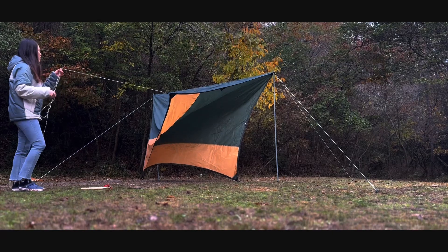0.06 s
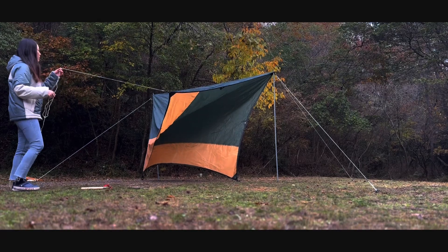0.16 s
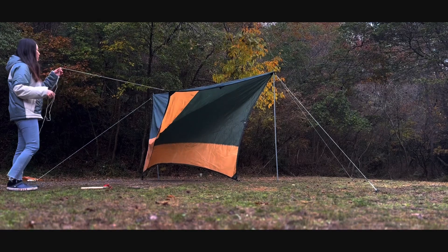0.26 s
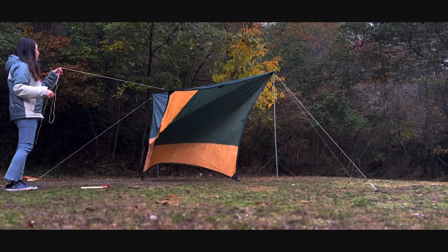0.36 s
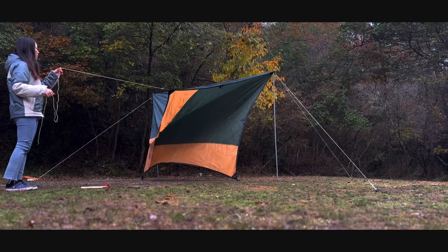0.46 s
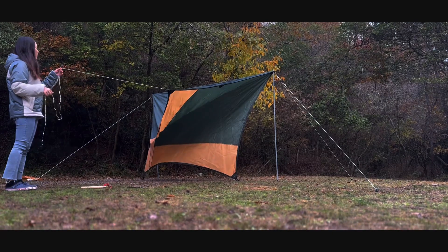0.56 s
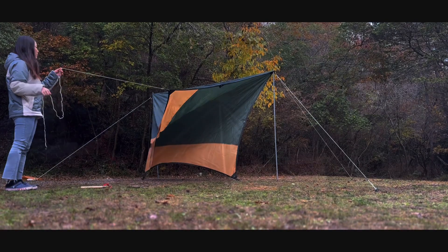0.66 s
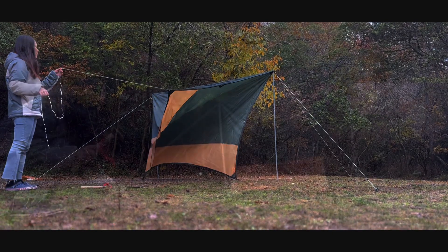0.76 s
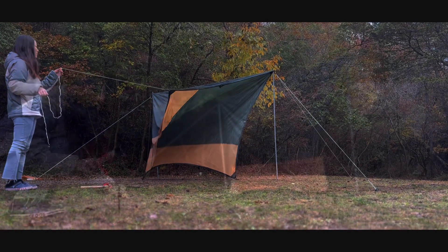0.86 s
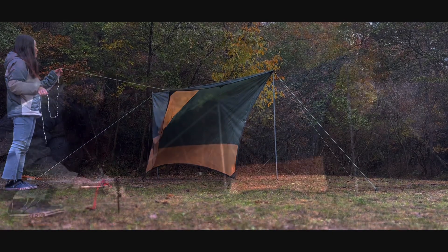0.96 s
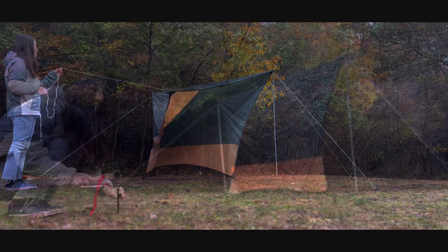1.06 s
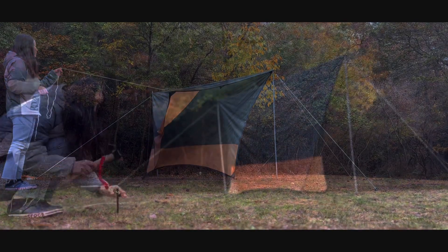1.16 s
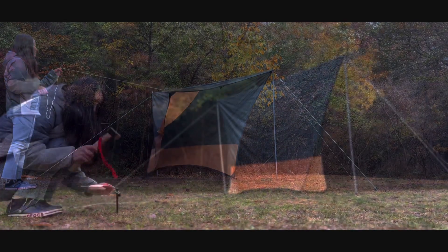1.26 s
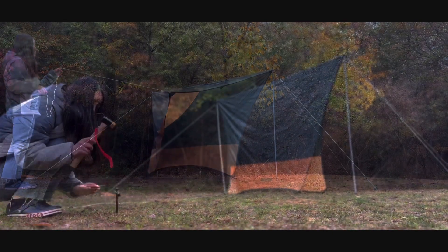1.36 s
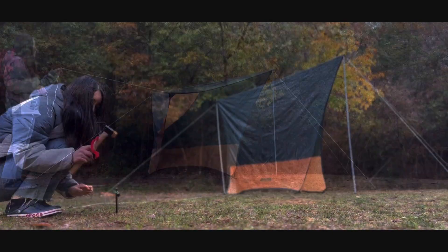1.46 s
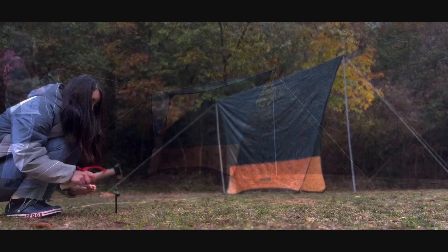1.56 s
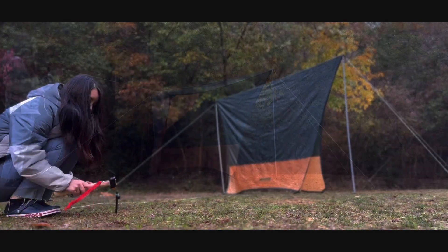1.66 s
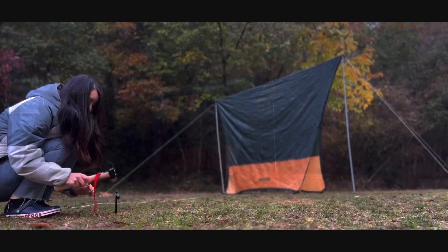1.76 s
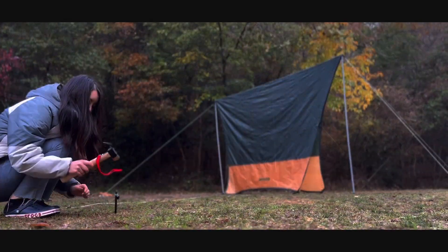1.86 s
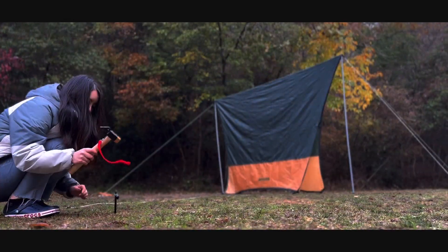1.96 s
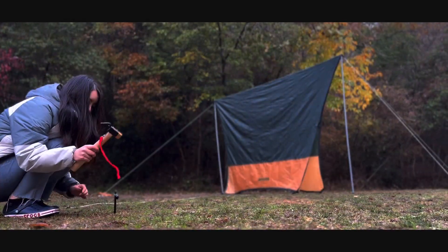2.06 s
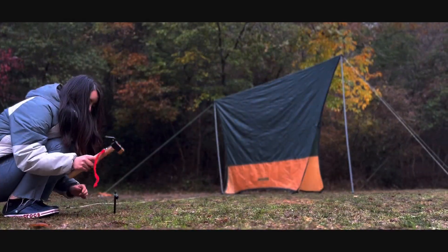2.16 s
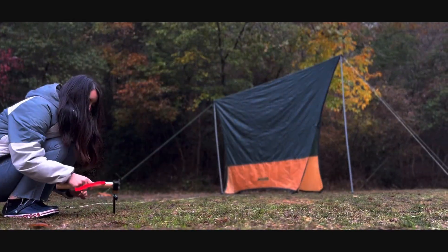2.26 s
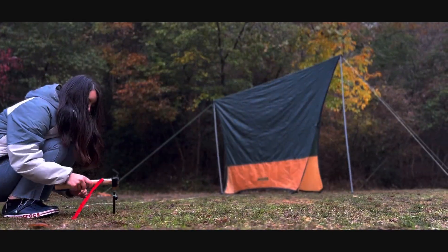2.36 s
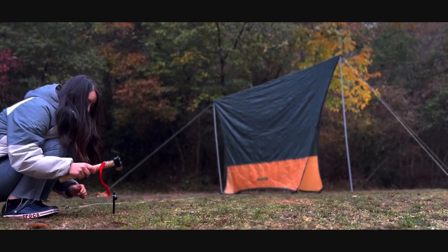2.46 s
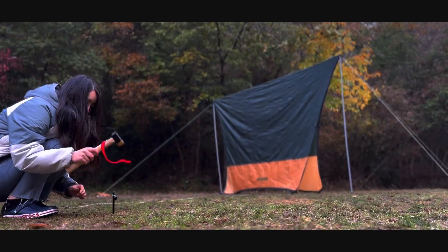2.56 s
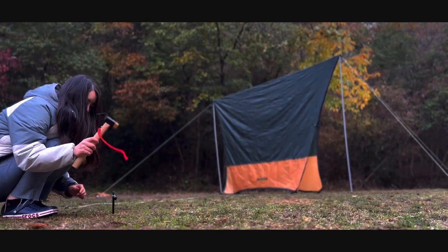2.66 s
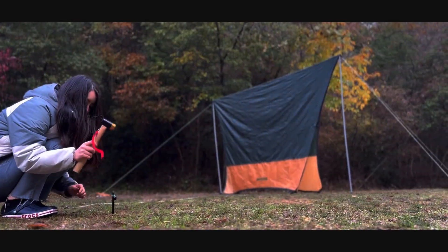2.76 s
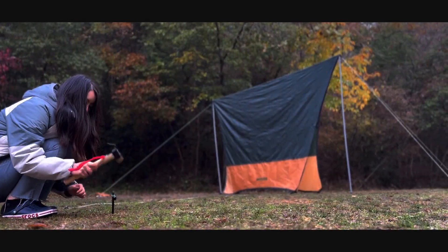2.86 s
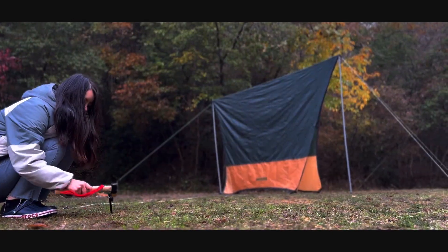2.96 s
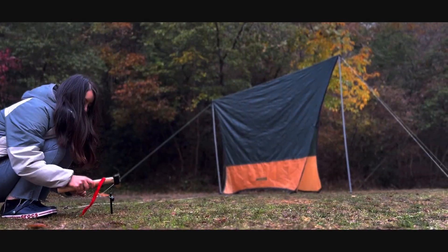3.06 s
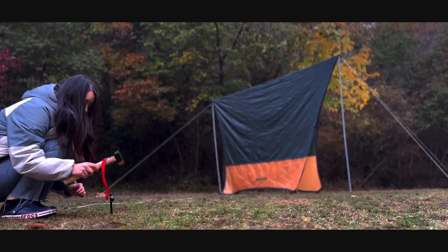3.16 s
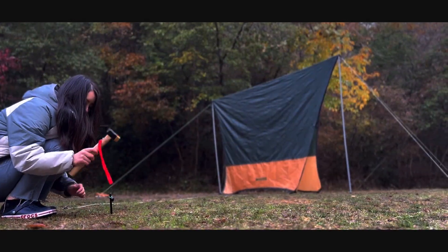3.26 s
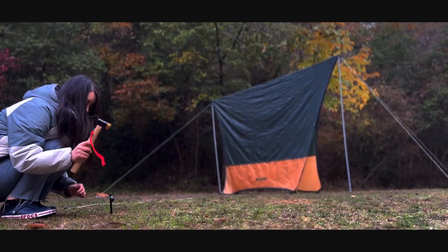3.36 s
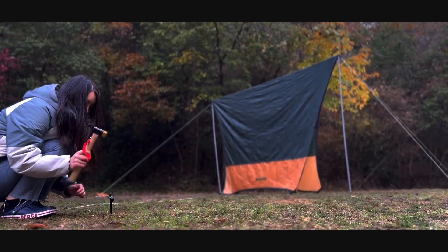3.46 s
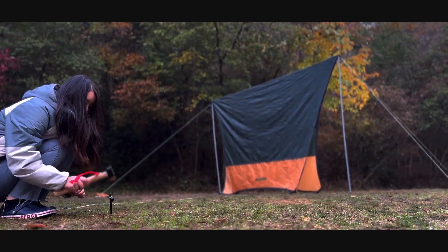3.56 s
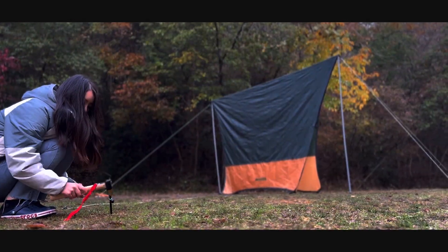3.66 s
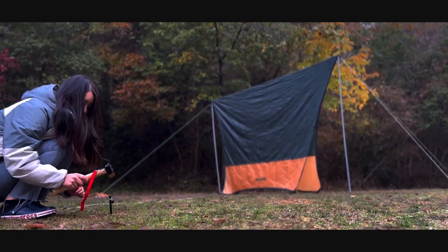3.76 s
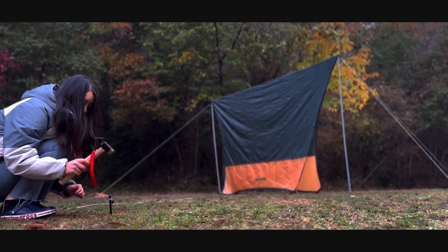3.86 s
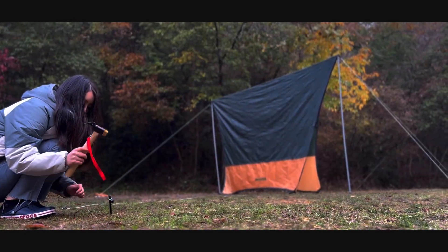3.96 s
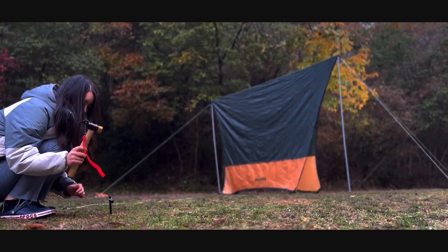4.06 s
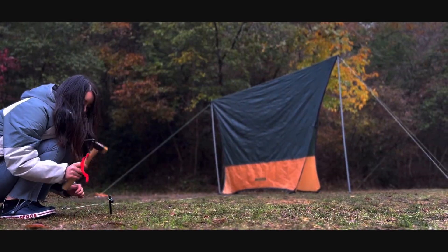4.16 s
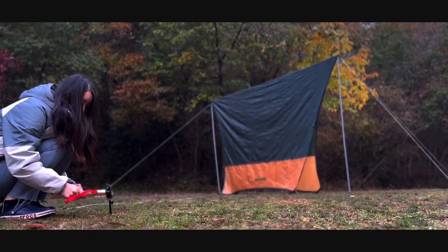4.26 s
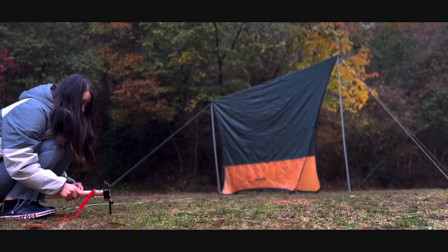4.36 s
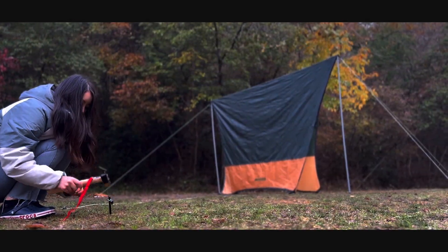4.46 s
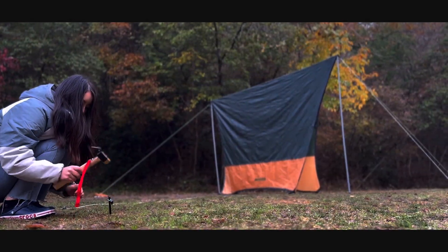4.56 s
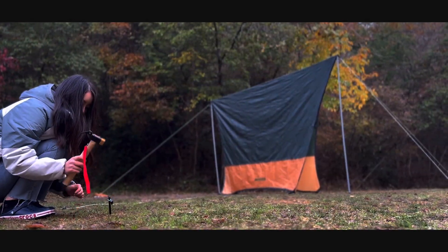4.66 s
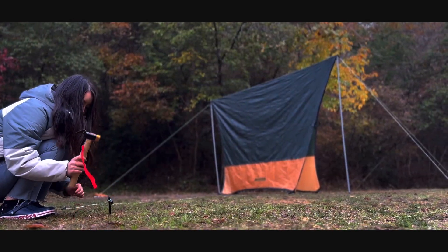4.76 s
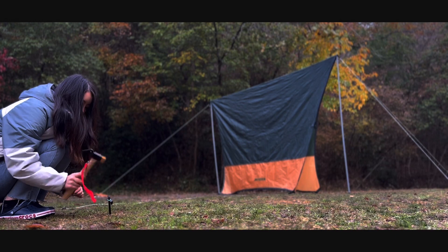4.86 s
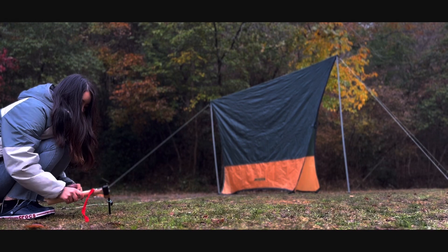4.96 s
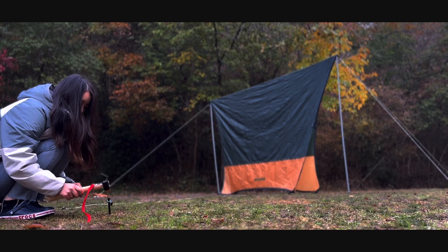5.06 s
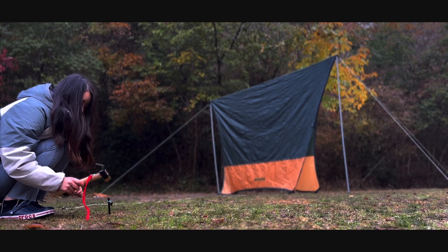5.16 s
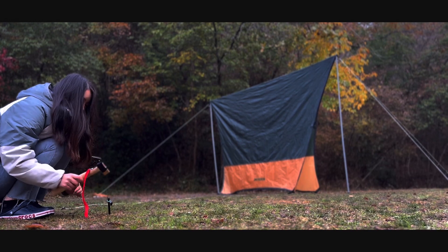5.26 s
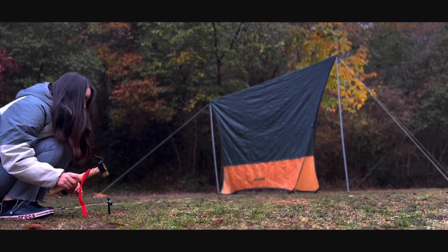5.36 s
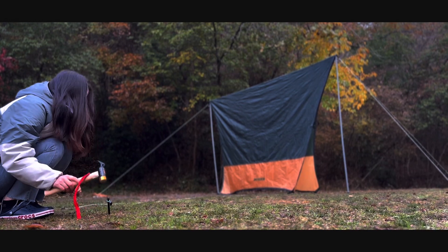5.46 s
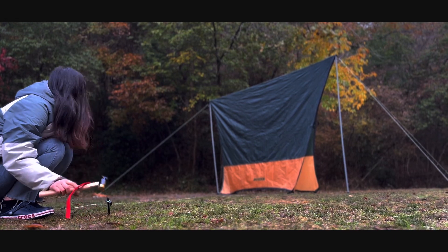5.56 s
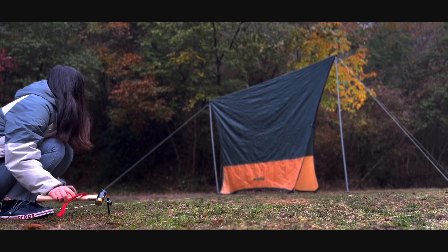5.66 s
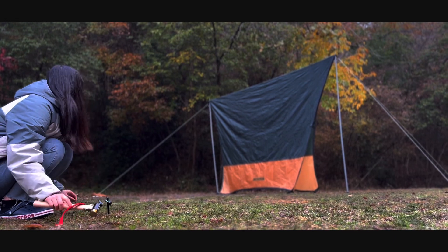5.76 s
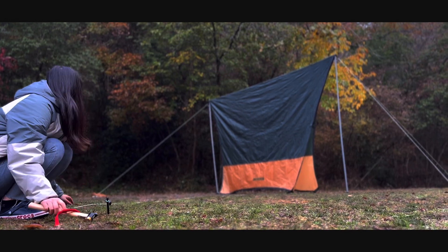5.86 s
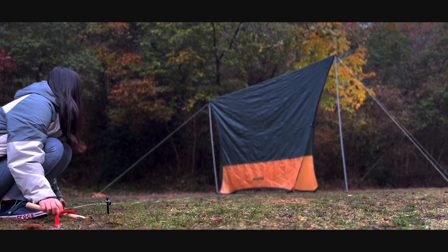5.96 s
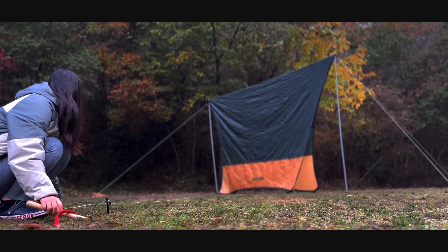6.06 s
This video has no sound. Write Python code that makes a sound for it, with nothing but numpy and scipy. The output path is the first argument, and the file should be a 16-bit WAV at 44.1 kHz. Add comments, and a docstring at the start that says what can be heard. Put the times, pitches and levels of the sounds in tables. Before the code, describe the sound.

A hammer drives a steel tent peg into the ground with seven sharp, steady clanks that echo off nearby trees.

```python
"""Light taps of gear sound in faint, still air at the edge of a wood; a foot settles in dry grass and a
low rumble sets in. A hammer then drives a steel tent peg into turf: seven blows, each led by the swish
of a nylon sleeve. Each impact excites the modes of the steel, which the soil damps at once into a hard
clank; twice the hammer drops back on the peg. The tarp reflects a quick slap, and scattering from the
trees returns a bright, swelling echo."""
import sys
import numpy as np
from scipy import signal
from scipy.fft import rfft, irfft
from scipy.io import wavfile

SR = 44100
rng = np.random.default_rng(int(sys.argv[2]) if len(sys.argv) > 2 else 0)


def put_to_file(sound):
    """Save the sound as 16-bit audio at rate SR, in the file named by the first command-line argument."""
    columns = np.atleast_2d(sound).T  # one column per channel
    safe = np.clip(columns, -1, 1)
    whole_steps = np.round(safe * 32767)
    wavfile.write(sys.argv[1], SR, whole_steps.astype(np.int16))


N = 269892

# hammer blows: t/s, force/dB, knock f/Hz, knock level/dB, clank gain/dB, treble gain/dB,
# peg note f/Hz, peg note level/dB, sleeve level/dB
BLOWS = [(0.929, -3.5, 1150, -23.5, 1, 3.5, 4943, -23, -76),
         (1.5825, -1, 1000, -21, 1.5, 2, 4430, -18, -77), (2.258, -1, 870, -19, 2, 3, 4436, -19.5, -79.5),
         (2.9196, -0.5, 1089, -20, 1, 1.5, 4380, -19, -73),
         (3.5834, 0.5, 1087, -20, 1, 5, 5124, -21.5, -71.5),
         (4.2438, -0.5, 672, -20, 2, 4.5, 5170, -24.5, -81.5),
         (4.9298, -1, 585, -18, 2, 4, 3634, -21, -81.5)]
THIRD_OCTAVES_HZ = 20 * 2 ** (np.arange(30) / 3)


def from_db(db):
    """Amplitude ratio of a level in decibels."""
    return 10 ** (np.asarray(db) / 20)


def at_hz(points, hz):
    """Interpolation on a logarithmic frequency axis."""
    freqs, values = np.transpose(points)
    return np.interp(np.log(hz), np.log(freqs), values)


def seconds(length):
    """Time axis of a given number of samples."""
    return np.arange(length) / SR


def unit_energy(x):
    """Normalisation to a mean energy of one per channel."""
    return x / np.sqrt(np.sum(x ** 2) / (x.size / x.shape[-1]) + 1e-20)


def butter(x, hz, kind, order=2):
    """Causal Butterworth filter."""
    sections = signal.butter(order, np.clip(hz, 10, .48 * SR), kind, fs=SR, output="sos")
    return signal.sosfilt(sections, x)


def add(track, s, sound):
    """Superposition of a sound on a track, starting at time s."""
    start = max(round(s * SR), 0)
    part = sound[:max(N - start, 0)]
    track[start:start + len(part)] += part


def hump(s, sigma_s):
    """Gaussian envelope centred on time s, peak 1."""
    return np.exp(-.5 * ((seconds(N) - s) / sigma_s) ** 2)


def waver(spread_db, step_s):
    """Random level drift in dB, with a new value every step."""
    return spread_db * np.interp(seconds(N) / step_s, np.arange(N), rng.standard_normal(N))


def stereo_bands(length):
    """Diffuse field in third octaves, most coherent in the bass: yields (f/Hz, stereo noise)."""
    # likeness of left and right: f/Hz, correlation
    likeness = [(60, 0.94), (130, 1), (290, 0.2), (640, 0.91), (1400, -0.55), (3100, .08), (6800, -0.42),
                (15000, -.05)]
    white = rng.standard_normal((2, 2, length))
    for k, edges in enumerate(zip(THIRD_OCTAVES_HZ, THIRD_OCTAVES_HZ[1:])):
        hz = np.sqrt(edges[0] * edges[1])
        mid, side = butter(white[k % 2], edges, "band")
        alike = np.clip(at_hz(likeness, hz), -1, 1)
        yield hz, np.sqrt(1 + alike) * mid + np.sqrt(1 - alike) * side * [[1], [-1]]


def diffuse_noise(spectrum):
    """Diffuse stereo noise with a given spectral shape, rms 1."""
    noise = sum(from_db(at_hz(spectrum, hz)) * band for hz, band in stereo_bands(N))
    return np.sqrt(N) * unit_energy(noise)


def still_air(level_db=-73):
    """Stationary noise: the faint, even hiss of air among the trees."""
    # hiss spectrum: f/Hz, relative density/dB
    spectrum = [(200, 4), (450, -10.5), (900, -10.5), (1800, -13.5), (3000, -18.5), (5500, -17),
                (9500, -25), (12500, -30), (16000, -31.5)]
    return from_db(level_db) * diffuse_noise(spectrum)


def tick(t, hz, t60, spread=1.93):
    """Heavily damped transient: decaying noise in a broad band round hz, peak 1."""
    noise = rng.standard_normal(len(t)) * from_db(-60 * t / t60)
    burst = butter(noise, [hz / spread, hz * spread], "band", order=3)
    return burst / np.abs(burst).max()


def gear_taps(thump_lag_s=0.00314):
    """Impulse response of tapped gear: a click, a short hollow resonance and a thump just behind."""
    # taps: t/s, level/dB, body f/Hz, click level/dB re body, thump level/dB re body
    taps = [(0.062, -58.5, 970, -10, -8), (.112, -66, 1090, -17, 0), (1.228, -52.5, 1530, -20, -28),
            (1.345, -51, 850, 6.5, 2.5), (1.785, -56.5, 990, -25, 0.5)]
    out, t = np.zeros(N), seconds(SR // 8)
    for s, db, body_hz, click_db, thump_db in taps:
        body = tick(t, body_hz, t60=0.043)
        click = from_db(click_db) * tick(t, hz=5000, t60=0.016)
        add(out, s, from_db(db) * (body + click))
        add(out, s + thump_lag_s, from_db(db + thump_db) * tick(t, hz=260, t60=0.05))
    return out


def footstep(step_s=.305, sole_lag_s=0.00815, grains_per_s=900, crunch_hz=1610, spread=1.97):
    """Brittle fracture: dry grass crunches under a sole, then single stalks snap, thinner ones last."""
    # snapping stalks: t/s, level/dB
    stalks = [(0.299, -61), (0.332, -56), (0.364, -51.5), (0.379, -54.5), (0.41, -56)]
    t = seconds(SR // 8)
    grains = (rng.random(N) < grains_per_s / SR) * rng.choice([-1, 1], N)
    grains = grains * from_db(3 * rng.standard_normal(N))
    crunch = butter(grains, [crunch_hz / spread, crunch_hz * spread], "band")
    out = from_db(-62) * hump(step_s, sigma_s=0.017) * crunch / crunch.std()
    add(out, step_s + sole_lag_s, from_db(-51) * tick(t, hz=208, t60=0.029))
    for s, db in stalks:
        snap_hz = 2830 + 5700 * (s - step_s)
        add(out, s, from_db(db) * tick(t, snap_hz, t60=0.0093, spread=2.15))
    return out


def distant_rumble(start_s=.468, rise_s=.028, lull_db=-65, boost_db=2):
    """Amplitude-modulated bass noise: a distant rumble sets in after a lull and wavers."""
    # slow drift of the rumble: t/s, relative level/dB
    drift = [(0.68, -47), (1.04, -46.5), (1.86, -50.5), (2.96, -50), (3.13, -52), (3.35, -55),
             (3.58, -52.5), (4.7, -51), (4.91, -46.5), (5.74, -48), (5.89, -50), (6.1, -49.5)]
    # rumble spectrum: f/Hz, relative density/dB
    spectrum = [(13, -41), (22, -10), (52, 1.5), (94, -0.5), (122, -5), (260, -26.5), (365, -58.5),
                (500, -35.5), (650, -73), (1100, -120)]
    t = seconds(N)
    onset = np.clip((t - start_s) / rise_s, 0, 1)
    drift_db = np.interp(t, *np.transpose(drift)) + boost_db
    envelope = from_db(lull_db + onset * (drift_db - lull_db) + waver(spread_db=1, step_s=.09))
    return butter(envelope * diffuse_noise(spectrum), 36, "high", order=4)


def sleeve(lead_s=.08, swing_sigma_s=.06, swing_rub_db=-1):
    """Sliding friction: nylon hisses and padding rubs as the arm swings or the body shifts."""
    # nylon on nylon: f/Hz, relative density/dB
    nylon = [(500, -12), (2000, -2), (3000, -10.5), (4500, -1.5), (6500, 2.5), (9500, -4), (12500, -4),
             (16000, -3.5)]
    # dull rub of the padding: f/Hz, relative density/dB
    padding = [(250, -7.5), (600, 1.5), (1100, 2.5), (1700, -10), (4000, -23.5), (12000, -43)]
    # shifts of the body: t/s, Gaussian width/s, hiss level/dB, rub level/dB
    shifts = [(.53, 0.1, -77.5, -78.5), (1.29, 0.1, -68, -72), (1.962, 0.066, -71, -69),
              (5.52, 0.16, -76.5, -80.5), (6.09, .074, -75, -70.5)]
    swings = [(s - lead_s, swing_sigma_s, db, db + swing_rub_db) for s, *_, db in BLOWS]
    hiss = rub = 0
    for s, sigma_s, hiss_db, rub_db in swings + list(shifts):
        speed = hump(s, sigma_s)
        hiss += from_db(hiss_db) * speed
        rub += from_db(rub_db) * speed
    folds = from_db(waver(spread_db=1.5, step_s=0.03))   # folds catch and slip
    return folds * (hiss * diffuse_noise(nylon) + rub * diffuse_noise(padding))


def strike_gain(hz, clank_db, treble_db):
    """The point of excitation on the peg head shifts weight between clank and treble."""
    curve = [(1000, 0), (2000, clank_db), (3300, clank_db), (5000, 0), (8000, 0), (12000, treble_db)]
    return from_db(at_hz(curve, hz))


def crack(t, tone, contact_s=.002, snap_db=3, snap_s=.0005):
    """Contact noise: steel snaps on steel and the peg grinds forward; the treble decays first."""
    # steel on steel and grit along the shaft: f/Hz, relative density/dB
    spectrum = [(150, 4.5), (400, 2), (560, 8.5), (900, 7.5), (1300, 4.5), (1800, -1.5), (2800, 10.5),
                (3900, -2.5), (5500, 4.5), (7500, 7.5), (11000, 1.5), (13500, -1.5), (16000, 6.5)]
    # decay of the crack: f/Hz, T60/s
    decay = [(200, .04), (800, .024), (2500, .02), (5000, .019), (8000, .015), (14000, .012)]
    out = np.zeros(len(t))
    for edges in zip(THIRD_OCTAVES_HZ[8:], THIRD_OCTAVES_HZ[9:]):
        hz = np.sqrt(edges[0] * edges[1])
        fade_db = snap_db * np.exp(-t / snap_s) - 60 * np.maximum(t - contact_s, 0) / at_hz(decay, hz)
        grind = butter(rng.standard_normal(len(t)) * from_db(fade_db), edges, "band")
        band_share = np.sqrt(2 * (edges[1] - edges[0]) / SR)
        out += unit_energy(grind) * band_share * from_db(at_hz(spectrum, hz)) * strike_gain(hz, *tone)
    return out


def ring(t, hz, t60):
    """Free vibration of one damped mode."""
    return np.sin(2 * np.pi * hz * t) * from_db(-60 * t / t60)


def steel_modes(t, tone, note_hz, note_db):
    """Modal superposition: the peg's note, which changes as it sinks, among other short-lived modes."""
    # modes of peg and hammer head: f/Hz, level/dB, T60/s
    modes = [(610, -28, .016), (1320, -27.5, .018), (2450, -27, .02), (2880, -24, .018),
             (3130, -27.5, .018), (3630, -27, .02), (4375, -28, .02), (5150, -28.5, .02), (6820, -27, .015),
             (7400, -23.5, .013), (8190, -22, .014), (9090, -30, .012), (12930, -16, .011),
             (13350, -18, .008), (14000, -24, .008), (15420, -22, .009)]
    out = from_db(note_db) * ring(t, note_hz, t60=.025)
    for hz, db, t60 in modes:
        stray_db, detune = rng.standard_normal(2)
        if abs(hz / note_hz - 1) > .03:   # the note replaces any mode within 3 %
            mode_hz = hz * (1 + .006 * detune)   # the soil grips differently each time
            amplitude = rng.choice([-1, 1]) * from_db(db + stray_db) * strike_gain(hz, *tone)
            out += amplitude * ring(t, mode_hz, t60)
    return out


def turf_thud(t, thud_hz=180, stiff_hz=100, relax_s=0.0042, thud_db=-28, t60=0.062, rise_s=0.003):
    """Damped oscillation of the ground under the peg, falling in pitch as its stiffness relaxes."""
    cycles = thud_hz * t + stiff_hz * relax_s * (1 - np.exp(-t / relax_s))
    envelope = from_db(thud_db - 60 * t / t60) * (1 - np.exp(-t / rise_s))
    return envelope * np.sin(2 * np.pi * cycles)


def impact(t, knock_hz, knock_db, tone, note_hz, note_db, knock_rise_s=.0008):
    """Impulsive excitation: one contact makes the peg clank and knock, and shakes the turf."""
    knock = from_db(knock_db) * ring(t, knock_hz, t60=0.02) * (1 - np.exp(-t / knock_rise_s))
    peg = crack(t, tone) + steel_modes(t, tone, note_hz, note_db) + knock
    radiated = butter(peg, 410, "high", order=3)   # little of the clank lies below 400 Hz
    return radiated + turf_thud(t)


def hammering(tones_db=0):
    """Impact and rebound: full blows, two followed by a softer and therefore duller contact."""
    # the hammer drops back on the peg: t/s, force/dB
    rebounds = [(1.6109, -19), (2.9377, -17.5)]
    out, t = np.zeros(N), seconds(SR // 10)
    for s, force_db, knock_hz, knock_db, clank_db, treble_db, note_hz, note_db, _ in BLOWS:
        hit = impact(t, knock_hz, knock_db + tones_db, (clank_db, treble_db), note_hz, note_db + tones_db)
        add(out, s, from_db(force_db) * hit)
    for s, force_db in rebounds:
        last_blow = max(blow for blow in BLOWS if blow[0] < s)
        _, _, knock_hz, knock_db, clank_db, treble_db, *note, _ = last_blow
        touch = impact(t, knock_hz, knock_db + 0.5, (clank_db, treble_db - 4.5), *note)
        add(out, s, from_db(force_db) * touch)
    return out


def tarp_slaps(x):
    """Early reflections: the tarp and the camp gear each throw back part of the spectrum."""
    # reflections: delay/s, level/dB, lowest f/Hz, highest f/Hz
    reflections = [(.0245, -29, 5000, 15000), (.020, -28, 600, 1200), (.032, -24, 1100, 2100)]
    out = np.zeros(N)
    for delay_s, db, low_hz, high_hz in reflections:
        add(out, delay_s, from_db(db) * butter(x, [low_hz, high_hz], "band"))
    return out


def wood_echo(x, first_s=0.0089, edge_s=0.02, full_s=.062, near_db=-7):
    """Scattering: ground and tarp answer faintly, then the tree line, fading into the wood's depth."""
    # echo spectrum: f/Hz, level/dB re the incident sound
    spectrum = [(150, -16.5), (400, -19.5), (800, -28.5), (1300, -16), (2800, -21.5), (4500, -11),
                (7500, -18), (11000, -21.5), (13000, -21.5), (16000, -27)]
    # reverberation time of the wood: f/Hz, T60/s
    decay = [(200, 0.2), (1000, 0.57), (3000, 0.42), (4500, 0.58), (8000, 0.38), (13000, 0.26),
             (16000, 0.15)]
    t = seconds(SR * 4 // 5)
    swell = from_db(np.interp(t, [0, first_s, edge_s, full_s], [-40, near_db, near_db, 0]))
    # single trunks make the echo lumpy
    lumps = from_db(np.interp(t, np.linspace(0, t[-1], 160), rng.standard_normal(160)))
    response = 0
    for hz, band in stereo_bands(len(t)):
        fade = from_db(-60 * np.maximum(t - full_s, 0) / at_hz(decay, hz))
        envelope = unit_energy(swell * fade * lumps)
        response += from_db(at_hz(spectrum, hz)) * envelope * band / np.sqrt(2)
    return signal.fftconvolve(x[None], response, axes=1)[:, :N]


def from_left(direct, scattered):
    """Localisation: the work sounds from the left, as the right channel is later and mostly weaker."""
    # balance of the two channels: f/Hz, left level/dB re right, coherence
    balance = [(60, 2, 1), (200, 1.8, 1), (380, 3, 1), (700, 5, .99), (1300, 4.8, .95), (2400, 4, .9),
               (4400, 4.2, .82), (8000, 2.2, .9), (10000, 0, .9)]
    # lag of the right channel: f/Hz, lag/s
    lag = [(1000, .00016), (1600, .00025), (2300, .00014), (3900, .00016), (4600, .0002), (5800, .000135),
           (7600, .000185), (10000, .000137), (13000, .000094), (16000, .000075)]
    hz = np.fft.rfftfreq(N, 1 / SR) + 1
    lean = from_db(at_hz(np.array(balance)[:, [0, 1]], hz) / 2)
    alike = at_hz(np.array(balance)[:, [0, 2]], hz)
    delay = np.exp(-2j * np.pi * hz * at_hz(lag, hz))
    left = rfft(direct)
    # a partly independent version of the sound mixes into the right channel
    right = (alike * left + 1j * np.sqrt(1 - alike ** 2) * rfft(scattered)) * delay
    return irfft(np.array([left * lean, right / lean]), N)


def lean_left(x, db):
    """Interchannel level difference: the left rises by db and the right falls by as much."""
    return x * from_db([[db], [-db]])


def scene():
    """Superposition of work on the left, its echoes from three stretches of trees, and the ambience."""
    # each direction gets its own crack; the peg's note and knock carry less to the trees
    rays = [hammering(tones_db=-2) for _ in range(3)]
    echo = sum(wood_echo(ray) for ray in rays) / np.sqrt(len(rays)) + tarp_slaps(rays[1])
    direct = gear_taps() + footstep() + hammering()
    scattered = gear_taps() + footstep() + rays[0]
    ambience = lean_left(still_air() + distant_rumble(), db=1.5)
    return ambience + from_left(direct, scattered) + sleeve() + lean_left(echo, db=0.93)


def record(dry, cutoff_hz=15900):
    """An elliptic low-pass filter cuts the highest treble steeply."""
    return signal.sosfilt(signal.ellip(10, .1, 80, cutoff_hz, fs=SR, output="sos"), dry)


dry = scene()
out = record(dry)
put_to_file(out)
```